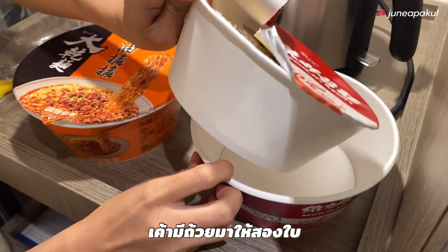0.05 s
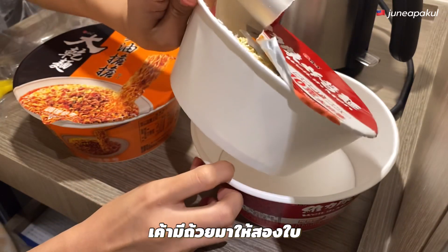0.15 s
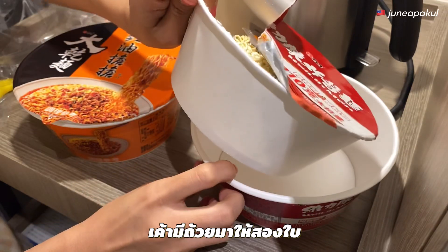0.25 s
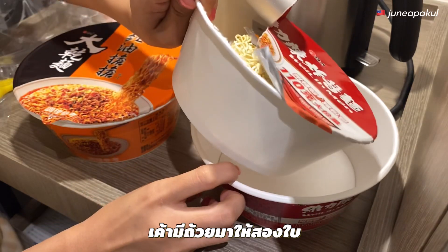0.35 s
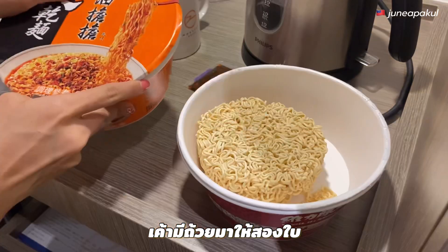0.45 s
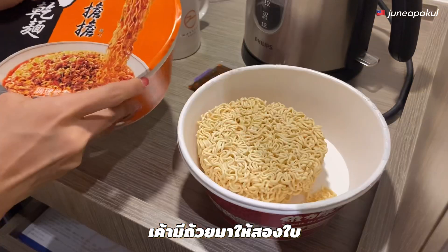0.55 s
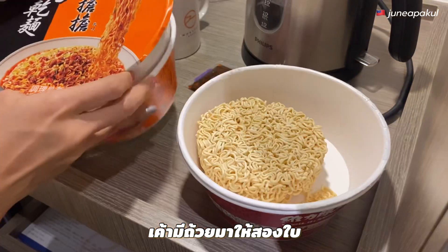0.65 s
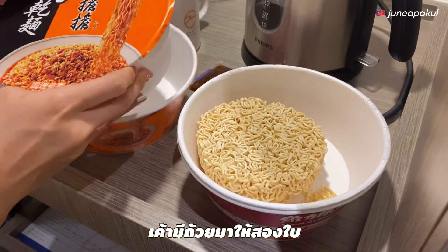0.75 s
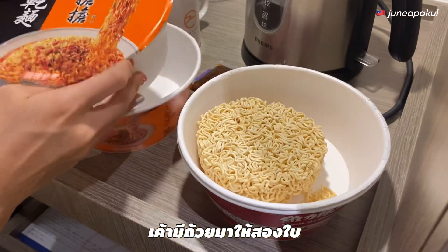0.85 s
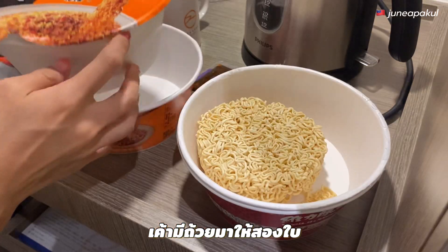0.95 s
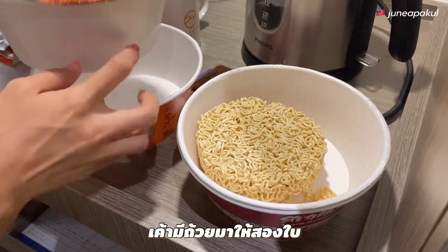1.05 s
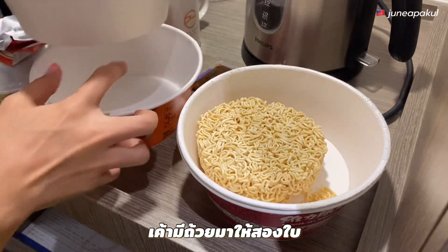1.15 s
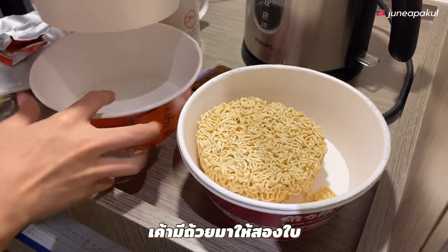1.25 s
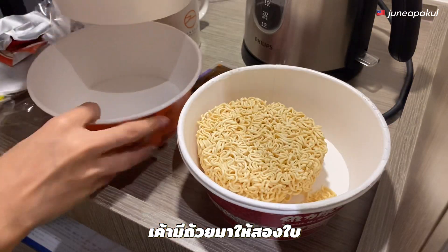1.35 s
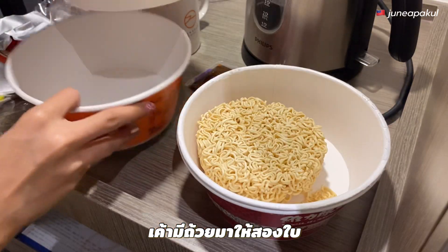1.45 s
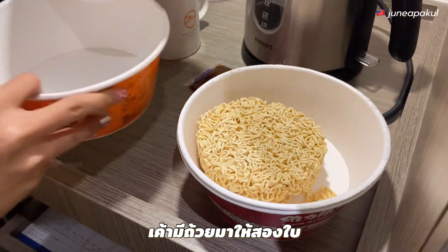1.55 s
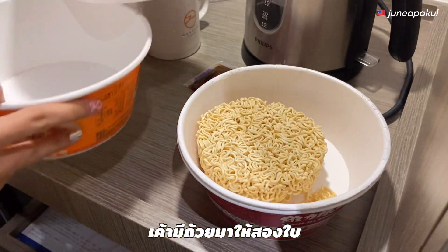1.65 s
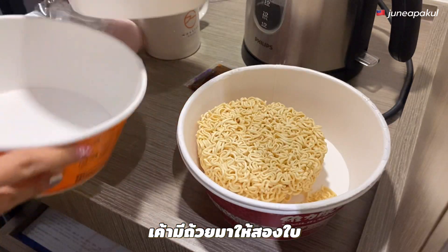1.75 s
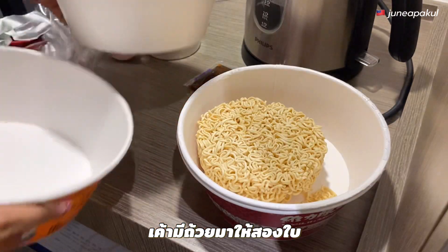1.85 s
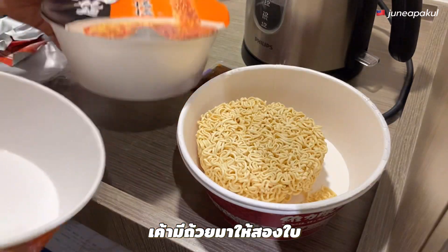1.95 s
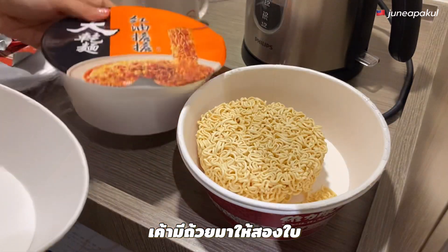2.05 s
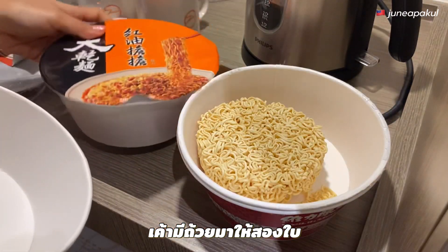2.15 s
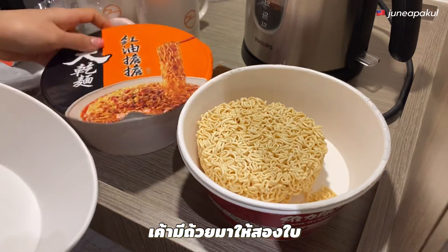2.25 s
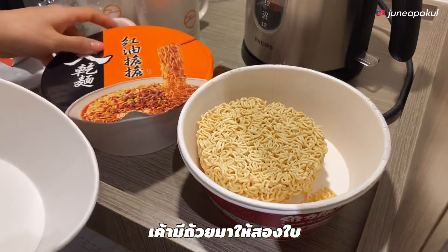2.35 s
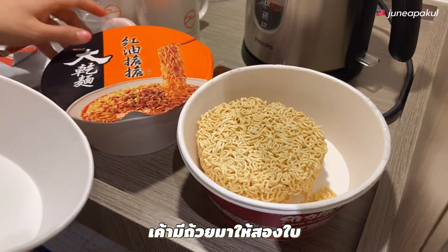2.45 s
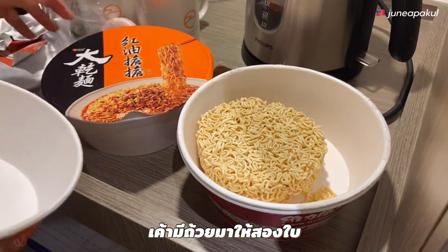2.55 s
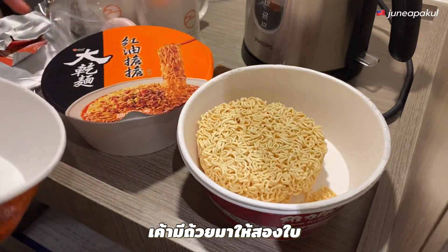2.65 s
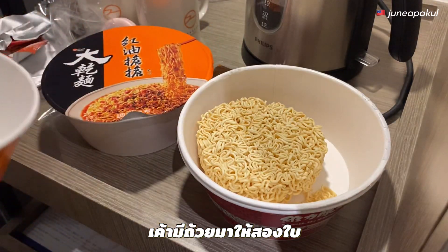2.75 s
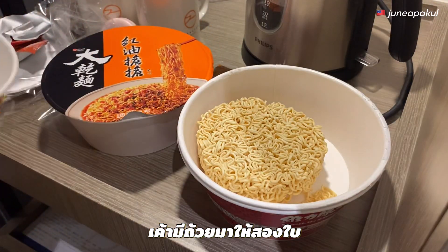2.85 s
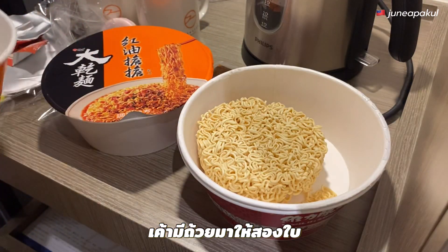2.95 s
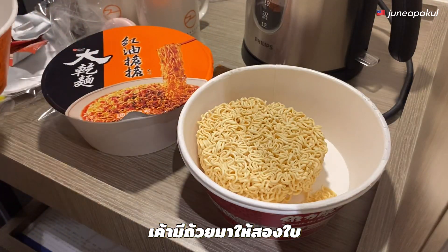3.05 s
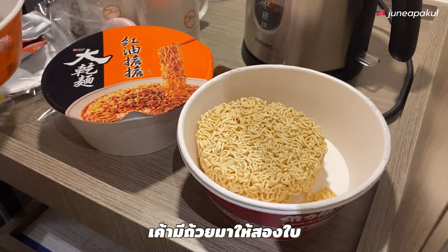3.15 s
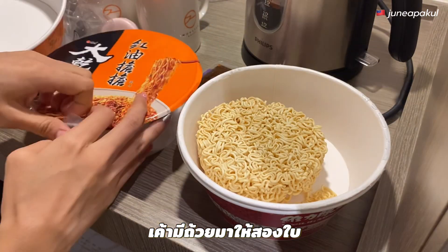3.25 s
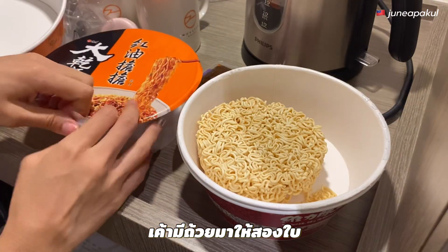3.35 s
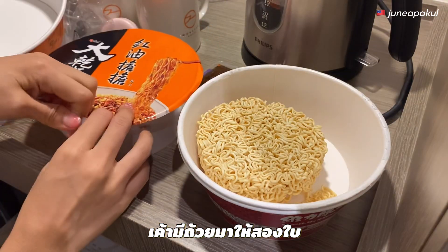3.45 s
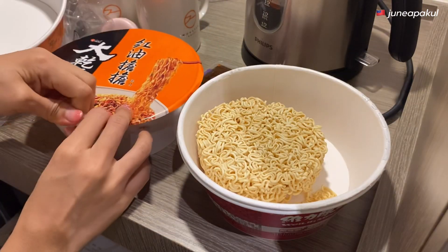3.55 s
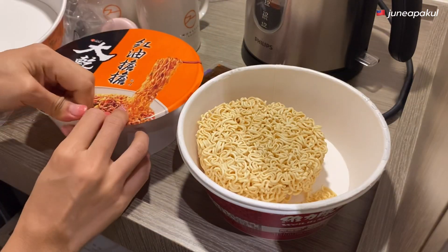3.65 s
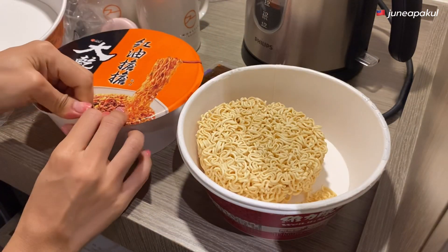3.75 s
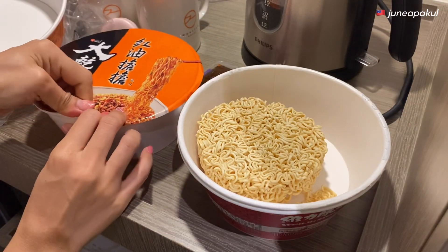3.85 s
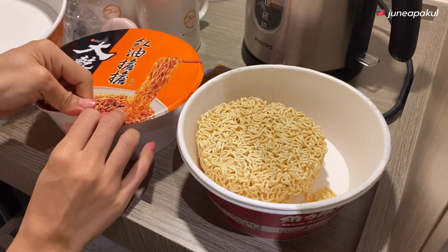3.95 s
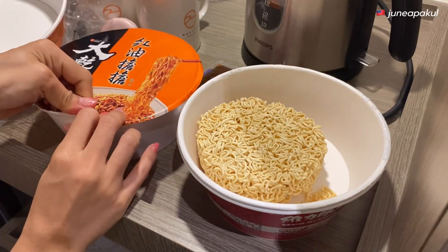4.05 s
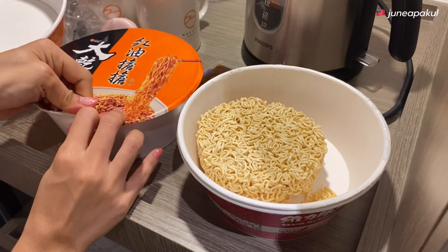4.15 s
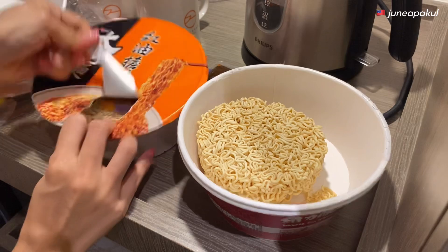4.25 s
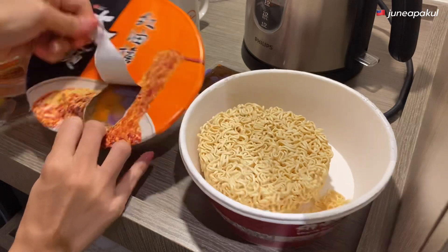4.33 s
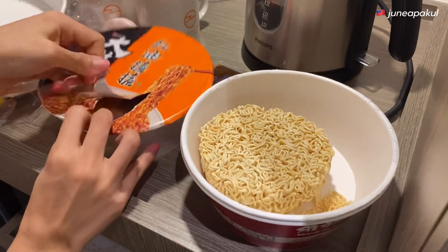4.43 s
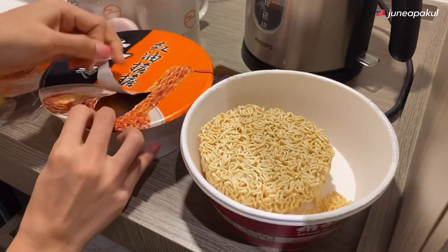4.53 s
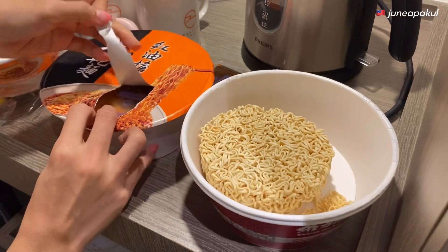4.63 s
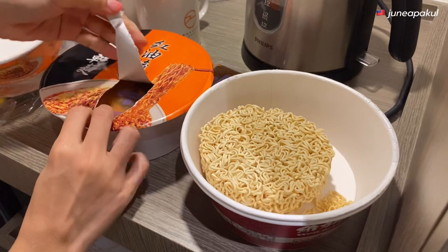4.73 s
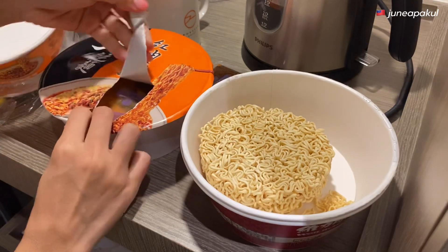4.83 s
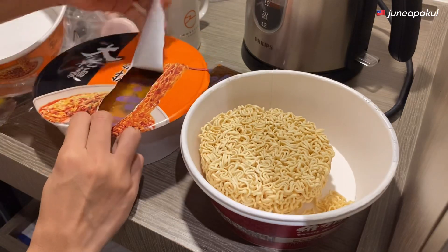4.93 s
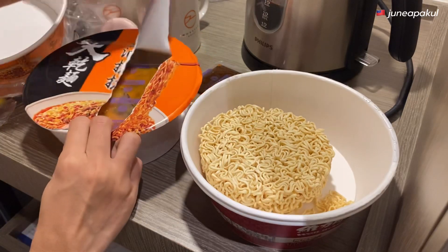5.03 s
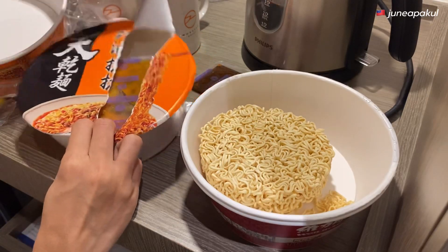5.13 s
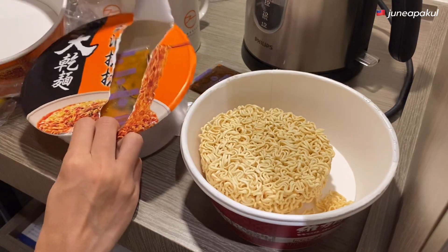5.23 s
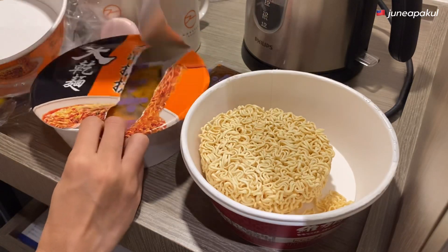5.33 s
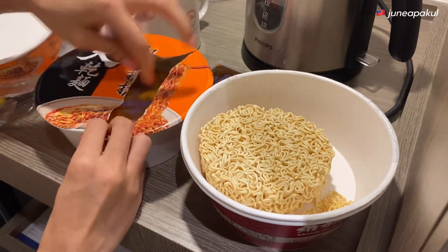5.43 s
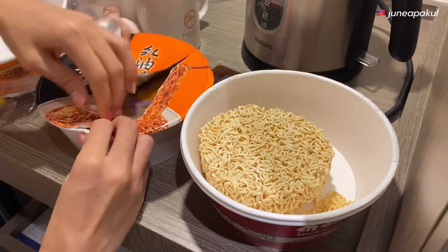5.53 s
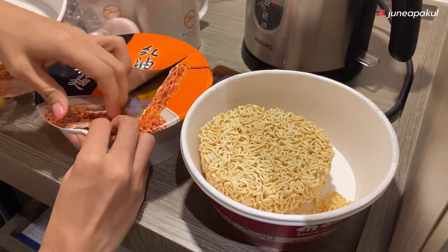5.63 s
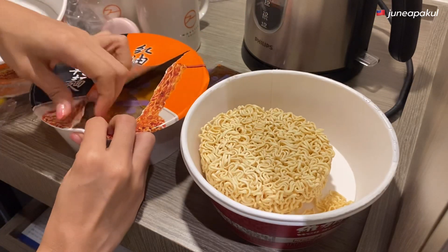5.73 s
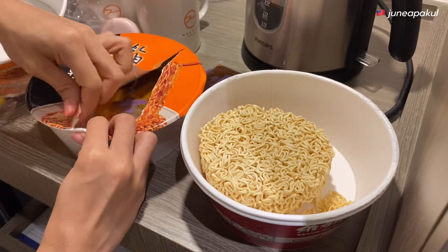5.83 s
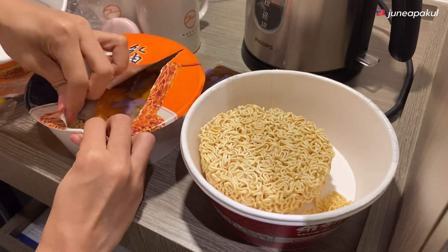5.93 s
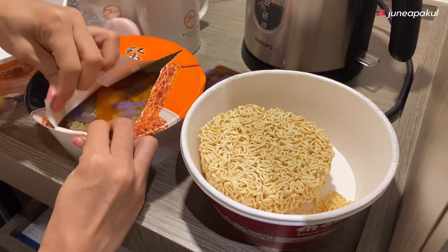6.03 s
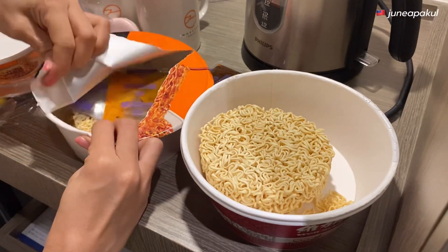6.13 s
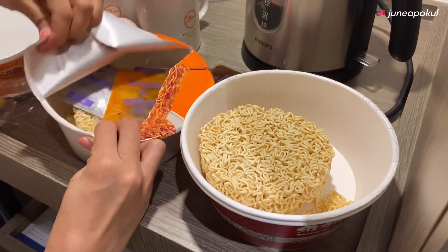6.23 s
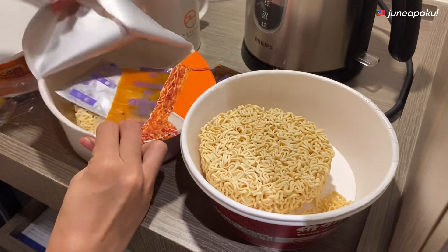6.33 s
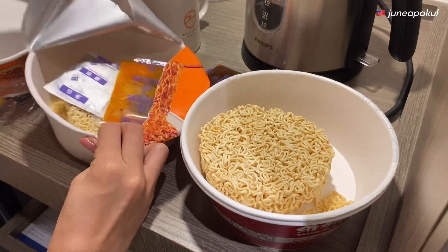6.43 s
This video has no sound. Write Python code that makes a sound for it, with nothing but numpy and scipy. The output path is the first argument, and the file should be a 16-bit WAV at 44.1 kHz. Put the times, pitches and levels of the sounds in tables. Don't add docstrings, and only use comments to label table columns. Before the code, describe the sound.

In a small humming room, hands rub and stack empty paper bowls with hollow knocks, light table thuds and a brief chatter. After a tap and a cluster of set-down knocks, fingers pick at a foil lid, then peel it in loud popping jerks and crackling tears that get softer and more rustly. Close phone microphone, stereo, short dull room tail.

```python
import sys
import numpy as np
from scipy import signal
from scipy.fft import rfft, irfft
from scipy.io import wavfile
from scipy.ndimage import uniform_filter1d

SR = 44100
rng = np.random.default_rng(int(sys.argv[2]) if len(sys.argv) > 2 else 0)


def unload_wav(signal):
    wavfile.write(
        sys.argv[1],
        SR,
        np.round(np.clip(np.atleast_2d(signal).T, -1, 1) * 32767).astype(np.int16),
    )


def level_to_linear(level):
    exponent = np.asarray(level, float) / 20
    return 10 ** exponent


N = 285768
T = np.arange(N) / SR
HZ = np.arange(N // 2 + 1) * SR / N + 1e-3


def along(table, column=1):
    table = np.array(table)
    return np.interp(np.log(HZ), np.log(table[:, 0] + 1), table[:, column])


def colour(x, gain):
    y = irfft(rfft(x) * gain, N)
    return y / np.sqrt(np.mean(y ** 2))


def resonances(peaks):
    total = 0
    for k, (hz, width, db) in enumerate(peaks):
        mode = 1j * HZ * width / (hz ** 2 - HZ ** 2 + 1j * HZ * width)
        total = total + (-1) ** k * level_to_linear(db) * mode
    return total


def steep(table):
    low = HZ / table[1][0]
    return level_to_linear(along(table)) * low ** 2 / (1 + low ** 2)


def walk(rate):
    hold = int(SR / rate)
    levels = np.repeat(rng.standard_normal(N // hold + 1), hold)
    return 1.4 * uniform_filter1d(uniform_filter1d(levels, hold), hold)[:N]


def decay(t, t60, rise):
    return (1 - np.exp(-t / rise)) * np.exp(-np.log(1000) * t / t60)


def add(out, s, x):
    i = int(s * SR)
    fade = np.minimum(np.arange(len(x))[::-1] / 600, 1)
    out[i:i + len(x)] += (x * fade)[:N - i]


def slips(rate, spread_db):
    sizes = level_to_linear(spread_db * np.minimum(rng.exponential(size=N), 3.5))
    return sizes * (rng.random(N) < rate / SR)


def stage(s):
    lid_s, open_s = 3.2, 5.2
    return (np.asarray(s) > lid_s) * 1 + (np.asarray(s) > open_s)


def by_bowl(x, *gains):
    voices = irfft(rfft(x) * np.array(gains), N)
    voices = voices / voices.std(axis=1, keepdims=True)
    return np.choose(np.minimum(stage(T), len(gains) - 1), voices)


# (frequency [Hz], level [dB])
ROOM_WASH = [(15, -48), (25, -25), (53, -2), (91, -16), (126, 2.5), (161, -12), (291, -14), (316, -9),
             (392, -16.5), (473, -48), (527, -8), (710, -20), (857, -24.5), (1280, -24.5), (15800, -64)]
# (frequency [Hz], width [Hz], level [dB])
DRONES = [(46, 19, -1), (115.2, 3.9, 3.5), (393, 31, -4), (540, 10.5, -6)]


def room_tone():
    gain = np.hypot(level_to_linear(along(ROOM_WASH)), np.abs(resonances(DRONES)))
    wash = colour(rng.standard_normal(N), gain / (1 + (HZ / 13000) ** 6))
    return wash * level_to_linear(-51.5 + 0.49 * walk(1.6))


# (frequency [Hz], level [dB], ring t60 [s])
TABLE_MODES = [(78, -6, 0.024), (154, 3.5, 0.075), (208, -5, 0.13)]
# (time [s], peak level [dB])
TABLE_THUDS = [
    (0.686, -29),
    (0.726, -39),
    (0.822, -45),
    (1.537, -29.5),
    (2.234, -30),
    (3.884, -48),
    (4.211, -58),
    (4.462, -56),
    (5.31, -55),
    (6.366, -38),
]


def thuds():
    out, t = np.zeros(N), T[:SR // 4]
    thud = sum(level_to_linear(db) * np.sin(2 * np.pi * hz * t) * decay(t, t60, 0.0013) for hz, db, t60 in TABLE_MODES)
    for s, db in TABLE_THUDS:
        add(out, s - .002, level_to_linear(db) * thud / np.abs(thud).max())
    return out


# (time [s], peak level [dB], pitch [Hz])
DAMPED_TONES = [(.688, -25, 1076), (.729, -15, 843), (0.729, -19.5, 1404), (.733, -20, 2158),
                (.83, -28, 2070), (1.538, -26, 312), (1.538, -30, 790), (2.237, -18.5, 323),
                (2.24, -15.5, 579), (3.228, -38.5, 1482), (3.346, -28.5, 353), (3.346, -31.5, 1393),
                (3.36, -49, 1610), (3.642, -26, 834), (3.643, -40, 1570), (3.888, -32, 1530),
                (2.2, -26, 777), (2.218, -19.5, 770), (5.315, -27, 677), (.83, -29, 800), (.745, -28, 754),
                (3.888, -33, 254), (4.211, -17, 1502), (4.211, -17, 884), (4.313, -16.5, 972),
                (4.46, -20, 1330), (4.459, -14, 1483), (4.684, -28, 830), (5.526, -29.5, 666),
                (5.527, -44, 1380), (6.367, -29, 820)]
# (time [s], peak level [dB], pitch [Hz])
FREE_TONES = [(.69, -26, 410), (.735, -31, 2140), (2.242, -23.5, 328), (.69, -28.5, 291), (3.352, -40, 441),
              (3.645, -38, 830), (3.889, -35.5, 252), (4.215, -30.5, 2430), (5.77, -36.5, 410)]


def tones():
    out, t = np.zeros(N), T[:SR // 8]
    for rows, t60 in ((DAMPED_TONES, 0.053), (FREE_TONES, 0.13)):
        for s, db, hz in rows:
            add(out, s - .001, level_to_linear(db) * np.sin(2 * np.pi * hz * t) * decay(t, t60, 0.0017))
    return out


# (time [s], peak level [dB], pitch [Hz])
BLURRED_RINGS = [(3.352, -40, 1500), (3.66, -43, 1570), (.75, -29, 1300), (.79, -31, 1100),
                 (.845, -30, 1500), (.87, -31, 890)]
# (time [s], peak level [dB], pitch [Hz])
RIM_SQUEAKS = [
    (1.1185, -31, 3360),
    (1.126, -35, 3440),
    (1.145, -50.5, 3400),
]
# (time [s], peak level [dB], pitch [Hz])
NAIL_TICKS = [(.642, -31.5, 3000), (1.121, -45, 1670), (1.131, -44, 1600), (1.208, -49, 1660),
              (1.22, -51, 1500), (1.227, -51, 1850), (4.418, -24, 2700), (4.904, -24, 3320),
              (6.44, -34, 5500), (1.3114, -43.5, 2140), (1.3713, -44, 2200), (1.6942, -37.5, 2920),
              (1.6945, -47, 4160), (5.874, -32.5, 5000), (5.947, -51, 4000), (5.316, -22.5, 3230),
              (3.073, -46.5, 2100), (3.2306, -28.5, 2050), (3.3544, -48, 1910), (3.6386, -32.5, 2430),
              (3.8856, -23.5, 2060), (4.9808, -17, 3280), (5.0774, -24, 2070), (5.6376, -53, 3520),
              (4.2098, -7, 2360), (4.4567, -11, 3030), (5.525, -38.5, 1840), (4.684, -31, 2180),
              (4.378, -30, 2350), (5.177, -30, 2350), (5.383, -28.5, 2130), (3.356, -37.5, 4060),
              (4.192, -43, 3020), (5.6568, -35, 3140), (6.256, -27, 2300), (6.4344, -31, 2730)]
# (time [s], peak level [dB], pitch [Hz])
FOIL_SNAPS = [(0.1785, -55, 11800), (2.127, -42, 4470), (2.4794, -52, 12200), (3.045, -48, 6300),
              (3.703, -55, 9940), (3.7625, -34, 9800), (3.7833, -39, 12000), (3.818, -40.5, 8500),
              (3.8302, -36, 13000), (3.857, -38.5, 13500), (3.8811, -32, 13800), (3.8944, -39, 13800),
              (3.9117, -28, 12300), (3.945, -44, 12500), (3.962, -36, 12500), (3.986, -42, 11000),
              (4.0382, -37.5, 12100), (4.097, -44, 12500), (4.125, -40, 11500), (4.136, -42, 11800),
              (4.148, -45, 12500), (4.0771, -52, 12600), (4.119, -49, 12000), (4.166, -36, 12900),
              (4.6618, -47, 11700), (4.75, -38.5, 9800), (4.832, -52, 12000), (5.896, -36, 11000)]
# (time [s], peak level [dB], pitch [Hz])
WALL_RINGS = [(0.6872, -12.5, 1140), (0.728, -7.5, 1250), (0.825, -14, 1320), (1.5377, -31, 790),
              (2.2164, -40, 866), (3.2226, -40, 2010), (3.3449, -25.5, 1500), (3.6389, -22.5, 1340),
              (3.8866, -22, 1500), (4.4565, -11, 1390), (4.518, -20.5, 1530), (4.9817, -15.5, 1560),
              (5.5234, -34.5, 1070), (5.7627, -30, 1540)]
# (time [s], peak level [dB],
# pitch [Hz])
BRIGHT_BURSTS = [(.688, -30, 5900), (.729, -44, 5000), (.772, -33, 6000), (.825, -33, 4800), (2.199, -30, 6100),
                 (2.217, -27, 6000), (2.236, -25.5, 6020), (4.831, -44, 8000), (4.848, -33, 8000),
                 (4.861, -32, 9000), (6.305, -34, 10950), (4.209, -9.5, 8900), (5.307, -31, 9000),
                 (5.42, -31, 11500), (5.51, -44, 11000), (5.764, -26, 7970), (5.874, -33, 9000)]


def ticks():
    # events, width as share of pitch, t60 in s
    bursts = [(BLURRED_RINGS, 0.18, .12), (RIM_SQUEAKS, 0.068, 0.014), (NAIL_TICKS, 0.41, 0.023),
              (FOIL_SNAPS, 0.82, 0.017), (WALL_RINGS, 0.45, 0.031), (BRIGHT_BURSTS, 1.2, .025)]
    out, t = np.zeros(N), T[:SR // 14]
    for rows, width, t60 in bursts:
        for s, db, hz in rows:
            edges = np.clip(hz * np.exp(np.array([-.5, .5]) * width), 200, 15800)
            band = signal.butter(2, edges, "band", fs=SR, output="sos")
            tick = signal.sosfilt(band, rng.standard_normal(len(t)) * decay(t, t60, .0001))
            add(out, s - .0005, level_to_linear(db) * tick / np.abs(tick).max())
    return out


# (frequency [Hz], level [dB])
EMPTY_WALL = [(530, 7.5), (900, 7.5), (1010, -3.5), (1360, -2), (1910, -6.5), (2150, -4.5), (2600, -9.5),
              (4030, -13.5), (6000, -24), (7800, -27.5), (13200, -120)]
# (frequency [Hz], level [dB])
LIDDED_WALL = [(530, 15.5), (900, 7.5), (1120, 3), (1200, 1), (1510, 3.5), (1650, -0.5), (3060, -6.5),
               (3260, -6.5), (3760, -6), (6000, -17), (7800, -20.5), (13200, -120)]
# (frequency [Hz], level [dB])
FOIL_SHEET = [(2940, 3), (5000, -0.5), (6030, 3), (6740, -11.5), (8210, -0.5), (11000, -7), (12500, -7),
              (13900, -10), (15800, -20)]


def sheets():
    return steep(EMPTY_WALL), steep(LIDDED_WALL), steep(FOIL_SHEET)


# (time [s], peak level [dB], bowl pitch [Hz], hardness = wall over bowl [dB], ring t60 [s])
STACKING = [(0.482, -44, 393, -18, 0.054), (0.569, -44, 494, -6, 0.13), (0.643, -46, 523, 2.5, 0.056),
            (0.688, -12.5, 425, -9.5, 0.11), (0.729, -13.5, 565, -10, 0.039), (0.773, -26.5, 412, -4, 0.1),
            (0.827, -20, 425.5, -6.5, 0.13), (1.538, -25.5, 420, -5, 0.077), (1.579, -37, 410, -4, 0.15),
            (2.144, -40, 590, -5.5, 0.049), (2.2, -22.5, 780, -7, 0.022), (2.218, -12, 715, -11.5, 0.06),
            (2.237, -9.5, 454, -11.5, 0.031), (2.262, -28, 504, -19, 0.058),
            (2.293, -25.5, 480, -14, 0.025), (2.312, -34, 455, -1.5, 0.038)]
CHATTERING = [(.746, -18, 480, -24, 0.022), (.793, -29, 468, -22, 0.078), (0.809, -34, 470, -26, 0.034),
              (0.819, -25, 507, -12, .04), (.842, -23, 540, -29, 0.049), (0.852, -30, 436, -27, 0.034),
              (.874, -29, 423, -20, 0.092), (.893, -27.5, 526, -15, 0.074), (.922, -35.5, 450, -11, 0.049)]
LID_JERKS = [(3.227, -26.5, 486, -8.5, 0.041), (3.346, -26, 470, -10, 0.035),
             (3.508, -31.5, 460, -38, 0.037), (3.642, -27.5, 527, -24, 0.047),
             (3.718, -39.5, 463, -26, 0.047), (3.743, -40, 457, -20, 0.037),
             (3.889, -16.5, 514, -10, 0.064), (4.202, -28, 510, -9, 0.037),
             (4.211, -1.5, 493.5, -11, 0.055), (4.229, -25, 480, -9, 0.019), (4.243, -15.5, 551, -15, .05),
             (4.311, -17.5, 450, -7.5, 0.046), (4.329, -26, 486, -6, 0.026), (4.417, -31, 420, -10, 0.019),
             (4.46, -7.5, 499, -6, 0.04), (4.521, -18, 502, -10, 0.029), (4.684, -19, 515, -23, 0.032),
             (4.698, -29.5, 505, -27, 0.03), (4.751, -26.5, 467, -14.5, 0.037),
             (4.786, -28, 444, -32, 0.033),
             (4.848, -25, 483, -35, 0.054), (4.865, -26, 446, -5.5, 0.12), (4.898, -20, 517, -13, 0.028),
              (4.911, -18.5, 563, -29, 0.075), (4.932, -16.5, 494, -30, 0.062),
              (4.951, -21, 435, -23, 0.036), (4.961, -18, 468, -29, 0.044), (5.012, -21, 570, -19, 0.056),
              (5.076, -27, 416, -2, .04), (5.118, -30, 420, -20, 0.034), (5.315, -18.5, 426, -15, 0.033),
              (5.526, -24.5, 496, -25, 0.064), (5.767, -24, 566, -5, 0.035), (5.872, -38.5, 425, -5, .04),
              (5.995, -38, 476, -23, 0.056), (6.021, -30, 517, -25, 0.13), (6.062, -30.5, 530, -14, 0.042),
              (6.115, -35, 427, -16, 0.025), (6.152, -41, 420, -17, .04), (6.188, -28, 340, -29, .04),
              (6.222, -30, 425, -23, 0.045), (6.284, -28.5, 368, -10.5, 0.045),
              (6.303, -31.5, 386, -20, 0.031), (6.364, -31, 410, -12, 0.072), (6.401, -25, 410, -16, 0.021),
              (6.43, -31, 434, -11, 0.027)]


def blows():
    return STACKING + CHATTERING + LID_JERKS


# one level [dB] per bowl (empty, lidded, half open)
SNAP_OVER_CRACK = (-23.5, -17, -7.5)


def snap_db(s):
    return np.take(SNAP_OVER_CRACK, stage(s))


def strokes(rest_db, *groups):
    t, power = T[::64, None], level_to_linear(rest_db) ** 2
    for s, db, rise, fall in groups:
        before, after = (s - t) / np.maximum(rise, .002), (t - s) / np.maximum(fall, .002)
        power = power + np.sum(level_to_linear(db - 30 * np.maximum(before, after)) ** 2, axis=1)
    return np.interp(T, t[:, 0], 10 * np.log10(power))


# (peak time [s], wall level [dB], foil over wall [dB], 30 dB rise [s], 30 dB fall [s])
BOWL_RUBS = [(0.494, -48.5, -14.5, 0.07, 0.18), (0.585, -50, -14, 0, 0.4), (0.62, -45, -9, 0.09, 0.38),
             (0.679, -42, -27, 0, 0.4), (0.8, -49, -54, 0, 0.22), (0.901, -48.5, -48, -0.3, 0.02),
             (1.124, -52.5, -14, 0.08, 0.2), (1.2, -59.5, -32, -1, 0.5), (1.366, -48, -9, 0.1, 0.07),
             (1.552, -39.5, -5, -0.04, 0.1542), (1.72, -60.5, 0, 1.3, 0.3), (2.005, -61.5, -3.5, -0.5, 0),
             (2.24, -34.5, 1, 0.0253, 0.0564), (2.289, -32.5, -8.5, 0.1265, 0.0247),
             (2.4, -54.5, -6, 0.8, 0.37), (3.042, -59, -11, 0.13, 0.2)]
LID_PULLS = [(3.215, -51, -12, 0.016, 1), (3.5, -67, -7, 0.95, 1), (3.645, -52, -46, 0.015, 0.086),
             (3.862, -66.5, 13.5, 0.44, 0.56), (4.13, -60.5, -9, 0.82, 0.3), (4.207, -32.5, 4, 0.028, 0.11),
             (4.25, -23, -6.5, 0.063, 0.12), (4.291, -29.5, -7, 0.06, 0.032),
             (4.451, -30, -8.5, 0.22, 0.048), (4.48, -33.5, -5, 0.032, 0.12), (4.54, -36.5, -12, 0.11, 0.1),
             (4.6, -48, -16.5, 0.83, 0.3), (4.846, -36.5, -9.5, 0.0096, 0.66),
             (4.908, -28.5, -4.5, 0.097, 0.3), (4.989, -25.5, -7, 0.16, 0.27), (5.079, -30, -7, 0.18, 0.17),
             (5.19, -41.5, -14.5, .15, 0.23), (5.309, -38.5, -8, .015, .1),
             (5.374, -37.5, -6.5, 0.19, 0.15), (5.6, -56.5, -12, 0.89, 0.98), (5.89, -58.5, 4, 0.14, 0.51),
             (6.016, -41.5, -5.5, 0.11, 1), (6.142, -41.5, -18, 0.39, 0.37), (6.225, -43.5, 1, 0.1, 0.11),
             (6.255, -39, -4, 0.29, 0.2), (6.36, -38, -1.5, 0.29, 0.25), (6.449, -34.5, -3, 0.48, 0.026)]
AIR_OVER_WALL = (-10.5, -6, -4)
RATTLE = (-16.5, -17, -24)
RUSTLE = (-17, -9, -6)
SETTLE = (0.14, 0.071, 0.069)
# one level [dB] each for bowl, wall, foil
RESTING = (-59.5, -79, -77)


def effort():
    s, db, bright_db, rise, fall = np.transpose(BOWL_RUBS + LID_PULLS)
    on_empty = stage(s) == 0
    rise = np.maximum(rise, np.where(on_empty, .045, 0))
    fall = np.maximum(fall, np.where(on_empty, .07, 0))
    air_db = db + np.take(AIR_OVER_WALL, stage(s)) - 0.44 * bright_db

    hit, peak_db, _, hard_db, _ = np.transpose(blows())
    bowl, lag_s = stage(hit), .004
    settle = np.take(SETTLE, bowl)
    rattle_db = peak_db + np.take(RATTLE, bowl)
    rustle_db = peak_db + hard_db + np.take(RUSTLE, bowl)
    after = hit + lag_s
    return (strokes(RESTING[0], (s, air_db, rise, fall), (after, rattle_db, lag_s, settle)),
            strokes(RESTING[1], (s, db, rise, fall), (after, rustle_db, lag_s, settle)),
            strokes(RESTING[2], (s, db + bright_db, rise, fall),
                    (after, rustle_db + snap_db(hit), lag_s, settle * .6)))


def crackle(patches, rate):
    grains = slips(rate, spread_db=2.2) * rng.standard_normal(N)
    out = np.zeros(N)
    for k, (hz, width, db) in enumerate(patches):
        pops = colour(np.roll(grains, k * 9973), resonances([(hz, width, 0)]))
        out += level_to_linear(db + 3.5 * walk(16)) * pops
    return out


# (frequency [Hz], width [Hz], level [dB])
EMPTY_AIR = [(290, 128, -8), (425, 33, -1.5), (565, 65, -4), (713, 177, -6), (890, 195, -7.5)]
LIDDED_AIR = [(354, 78, -9.5), (494, 55, -6.5), (717, 185, -12.5), (830, 106, -5.5)]
OPENED_AIR = [(309.6, 75, -3.5), (410, 66, 1.5), (470, 75, 1.5), (800, 89, -0.5)]
PAPER_CREASES = [(1470, 190, -2.5), (1970, 260, -7), (3000, 290, -6), (3850, 170, -10.5), (4740, 350, -9.5),
                 (6500, 110, -19)]
TAUT_FOIL = [(5000, 1200, -5), (6740, 790, -4), (9100, 740, -7.5), (10600, 630, -5), (12300, 870, -2),
             (13800, 620, -8.5)]


def rubbing(count):
    bowl_db, wall_db, foil_db = effort()
    grip = .9 * walk(70) + 1.2 * walk(260)
    sizes = slips(900, 3.0), slips(7000, 1.8), slips(9000, 1.5)
    low = resonances([(75.0, 95, 1.1), (204, 160, -2.5)])
    rumble = level_to_linear(0.54 * bowl_db - 30.0 + 0.69 * walk(6)) * colour(rng.standard_normal(N), low)
    airs = [resonances(air) / (1 + (HZ / 3000) ** 2) for air in (EMPTY_AIR, LIDDED_AIR, OPENED_AIR)]
    bare, lidded, foil = sheets()
    skins = [foil / (1 + (HZ / 12000) ** 4), foil]
    pops = level_to_linear(-11.0) * crackle(PAPER_CREASES, rate=400)
    glints = level_to_linear(-9.0) * crackle(TAUT_FOIL, rate=1900)
    glints = glints * level_to_linear(-9.0 * (stage(T) == 0))
    paths = []
    for _ in range(count):
        coarse, fine, finest = (size * rng.standard_normal(N) for size in sizes)
        air = by_bowl(coarse, *airs)
        wall = level_to_linear(-1.5) * by_bowl(fine + 0.17 * coarse, bare, lidded) + pops
        hiss = level_to_linear(-2.0) * by_bowl(fine + 0.97 * finest, *skins) + glints
        paths.append(level_to_linear(bowl_db - 1.0 + grip) * air
                     + level_to_linear(wall_db + grip) * wall
                     + level_to_linear(foil_db + 1.2 * grip) * hiss
                     + rumble)
    return np.array(paths)


# (pitch ratio, level [dB], extra decay time over t60)
BOWL_MODES = [(1, -1, 2.7), (0.885, -11.5, 1.3), (1.334, -7.5, 0.86), (1.664, -9, 0.7),
              (1.82, -18.5, 0.079), (4.2, -18, 0.092), (0.723, -17.5, 0.6)]


def bowl_ring(t, hz, t60, chance):
    held = np.exp(-(4.13 * t / t60) ** 4.6) + level_to_linear(-20) * np.exp(-2.5 * t / t60)
    ring = np.zeros(len(t))
    for (ratio, db, longer), e in zip(BOWL_MODES, chance):
        pitch = hz * ratio * (1 + 0.021 * e * (ratio != 1))
        ring += level_to_linear(db + 2.0 * e) * np.sin(2 * np.pi * pitch * t) * np.exp(-t / (t60 * longer))
    ring *= (1 - np.exp(-t / .0016)) * held
    return ring / np.abs(ring).max()


def knocks(wall, foil, chances, late):
    out, t = np.zeros(N), T[:SR // 10]
    strike, push = .00015, .0008
    crack = level_to_linear(4.5) * (decay(t, 0.023, strike) + level_to_linear(-14.0) * decay(t, 0.14, push))
    snap = level_to_linear(5) * (decay(t, 0.022, strike) + level_to_linear(-18.0) * decay(t, 0.031, push))
    for (s, db, hz, hard_db, t60), chance in zip(blows(), chances):
        i = min(int(s * SR) + late, N - len(t))
        wall_db = db + hard_db
        foil_db = wall_db + snap_db(s) + .5 * (hard_db + 8.5)
        add(out, s - .0015, level_to_linear(db) * bowl_ring(t, hz, max(t60, .01), chance)
            + level_to_linear(wall_db) * wall[i:i + len(t)] * crack
            + level_to_linear(foil_db) * foil[i:i + len(t)] * snap)
    return out


def walls(x, db, t60, damp_hz):
    echo = rng.standard_normal(SR // 2) * decay(T[:SR // 2], t60, 0.00059)
    echo = signal.lfilter([1], [1, -np.exp(-2 * np.pi * damp_hz / SR)], echo)
    return x + level_to_linear(db) * signal.fftconvolve(x, echo / np.sqrt(np.sum(echo ** 2)))[:N]


# (frequency [Hz], near sounds, far sounds)
LIKENESS = [(60, 0.84, 0.98), (410, 0.86, 0.68), (670, 0.35, 0.21), (1500, 0, 0.048), (2560, 0.46, 0.11),
            (5470, 0, 0.12), (8300, 0.78, 0.6), (12200, 0.87, 0.85)]
# (frequency [Hz], phase [radians])
LEFT_LEAD = [(0, 0), (430, -.15), (560, -1.1), (700, -2.6), (950, -3.2), (1290, .6), (1640, .8),
             (2410, -.1), (5080, -.7), (5510, -1.3), (6460, -6.3), (7240, -8.2), (7920, -8.5),
             (11500, -6.3), (15500, -6.3)]
# (frequency [Hz], level [dB])
LEFT_LEAN = [(60, -0.5), (110, 1), (200, 3.5), (380, 3), (700, 3), (1290, -0.5), (2380, 0), (4400, -2.5),
             (8120, -2.5), (15000, 3.5)]


def pair(common, apart, column, turn=1):
    like = np.clip(along(LIKENESS, column=column), 0, 1)
    side = np.array([[.5], [-.5]])
    lead = turn * np.interp(HZ, *np.transpose(LEFT_LEAD))
    body = level_to_linear(side * along(LEFT_LEAN)) * np.exp(1j * side * lead)
    return irfft(body * (np.sqrt(like) * common + np.sqrt(1 - like) * apart), N)


def scene():
    bare, lidded, foil = sheets()
    wall_grain = by_bowl(rng.standard_normal(N), bare, lidded)
    foil_grain = colour(rng.standard_normal(N), foil)
    far = rfft([room_tone() for _ in range(3)])
    table, singing = thuds(), tones()
    near = []
    for path, late in zip(rubbing(count=3), (0, 700, 1500)):
        chances = np.clip(rng.standard_normal((len(blows()), len(BOWL_MODES))), -1.5, 1.5)
        near.append(path + knocks(wall_grain, foil_grain, chances, late) + ticks() + table)
    near.append(singing)
    near = rfft([walls(path, db=-13.5, t60=0.2, damp_hz=2400) for path in near])
    return (pair(near[0], near[1:3], column=1)
            + pair(near[3], near[3], column=1, turn=0.51)
            + pair(far[0], far[1:], column=2))


def roll_off(x):
    return signal.sosfilt(signal.butter(12, 15950, fs=SR, output="sos"), x)


def record(dry):
    no_bass = signal.sosfilt(signal.butter(4, 38, "high", fs=SR, output="sos"), dry)
    rounded = np.tanh(no_bass / 1.05) * 1.05
    mix = signal.sosfilt(signal.ellip(10, .2, 70, 15900, fs=SR, output="sos"), rounded)
    return roll_off(mix)


dry = scene()
out = record(dry)
unload_wav(out)
```